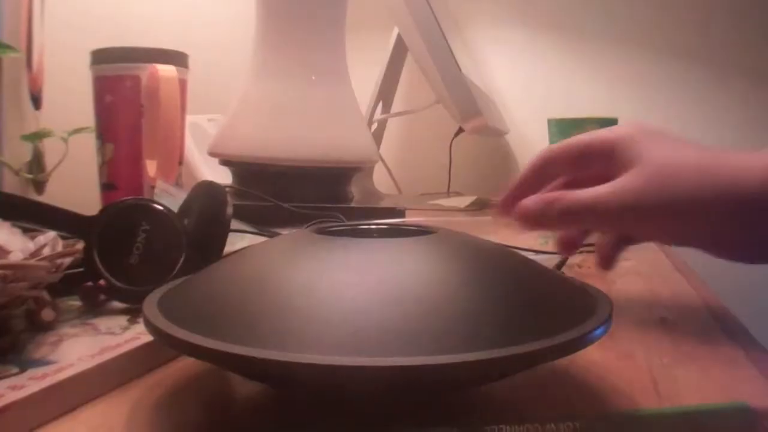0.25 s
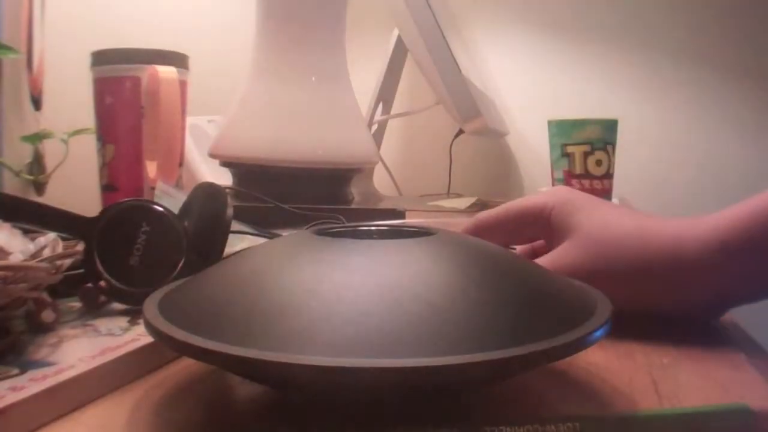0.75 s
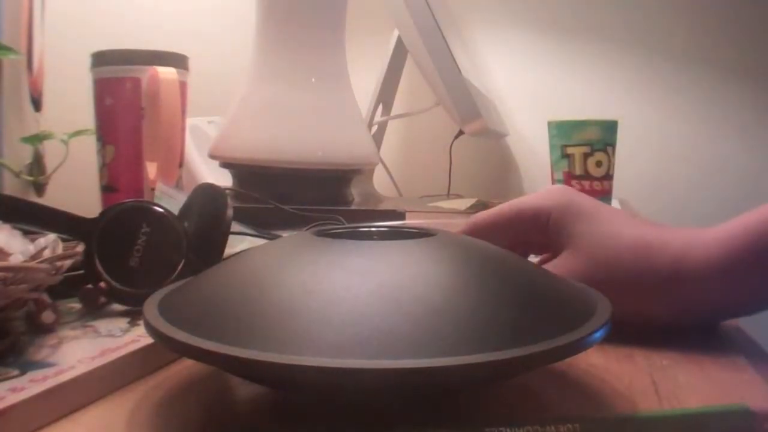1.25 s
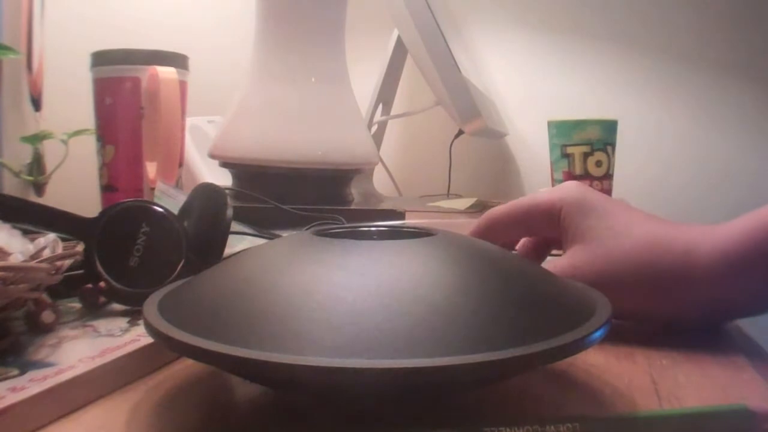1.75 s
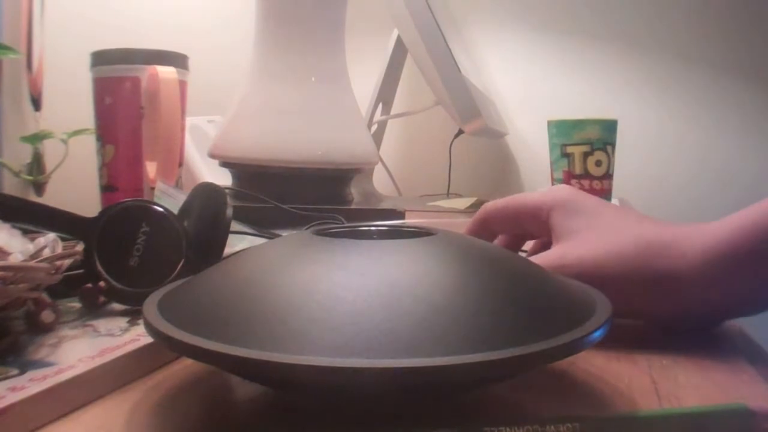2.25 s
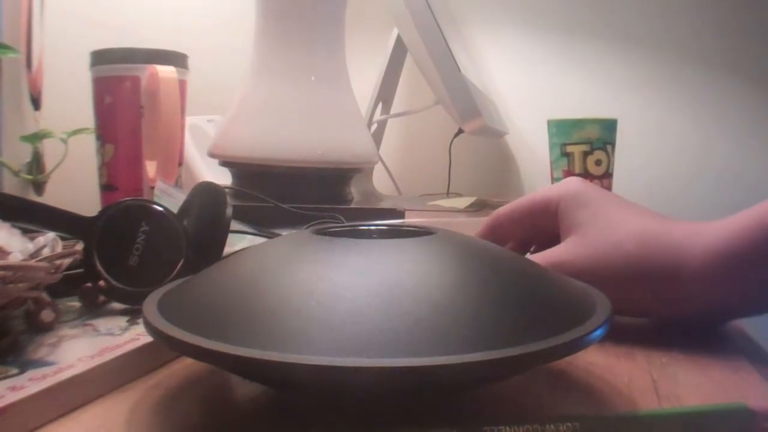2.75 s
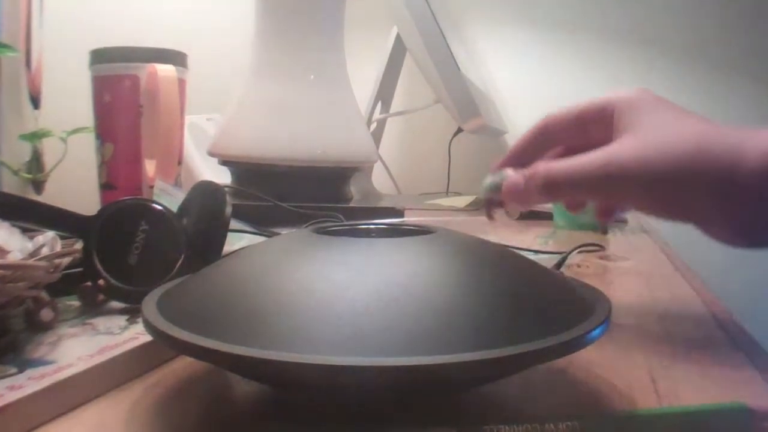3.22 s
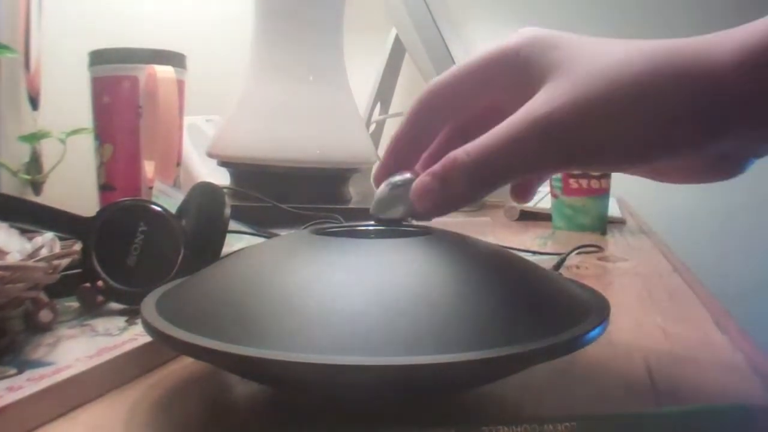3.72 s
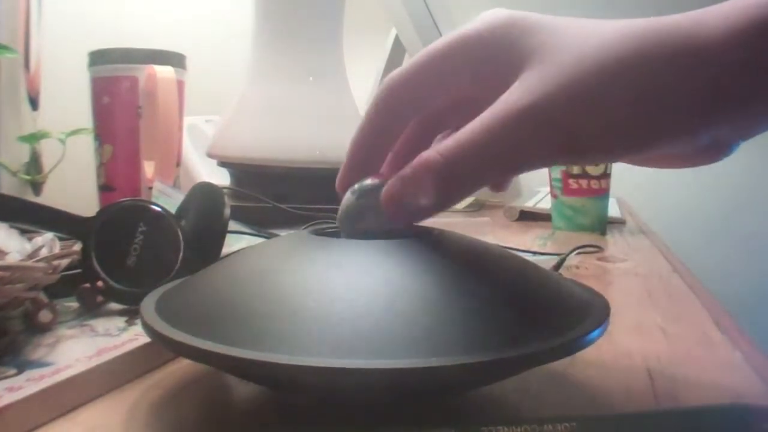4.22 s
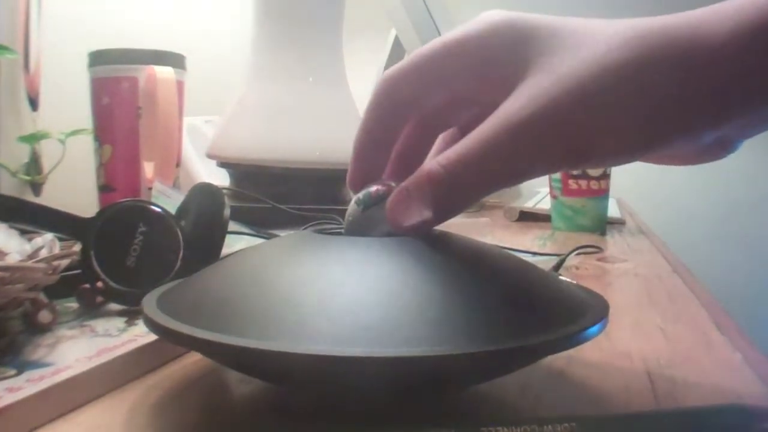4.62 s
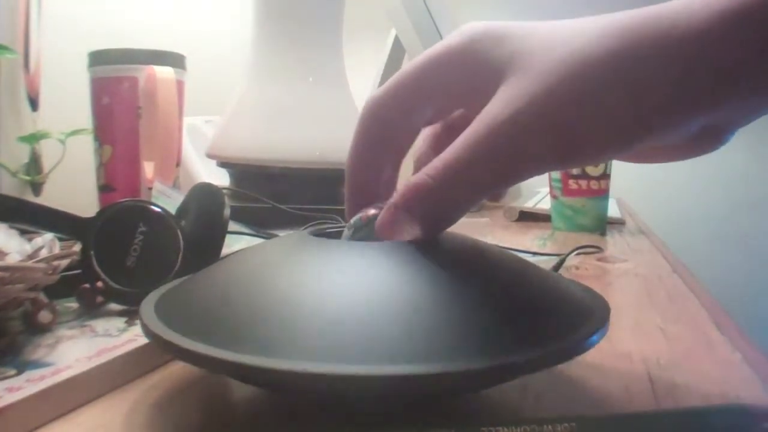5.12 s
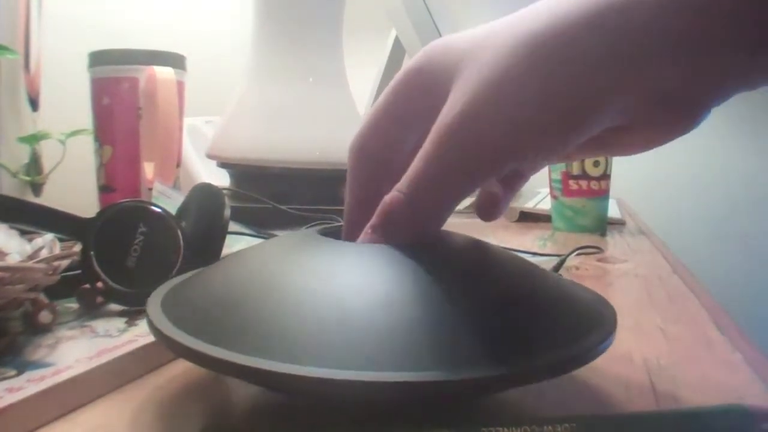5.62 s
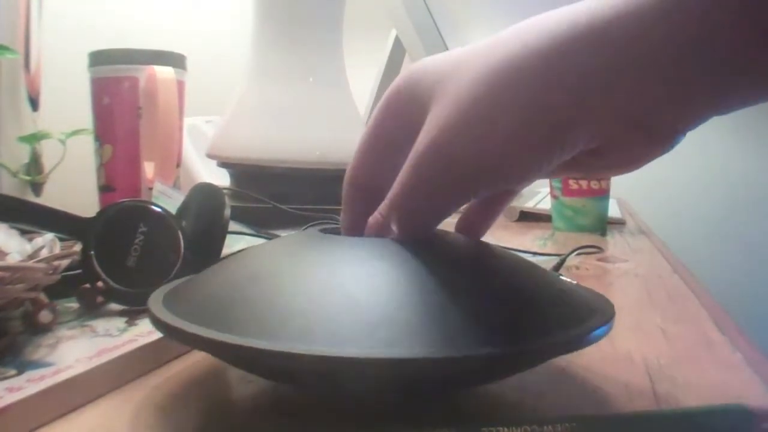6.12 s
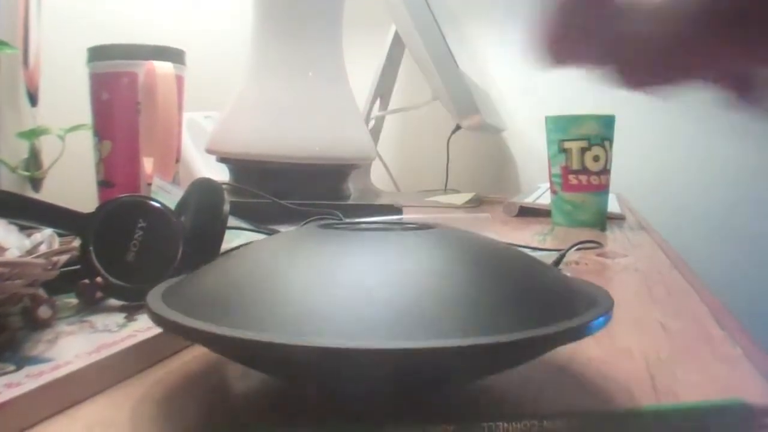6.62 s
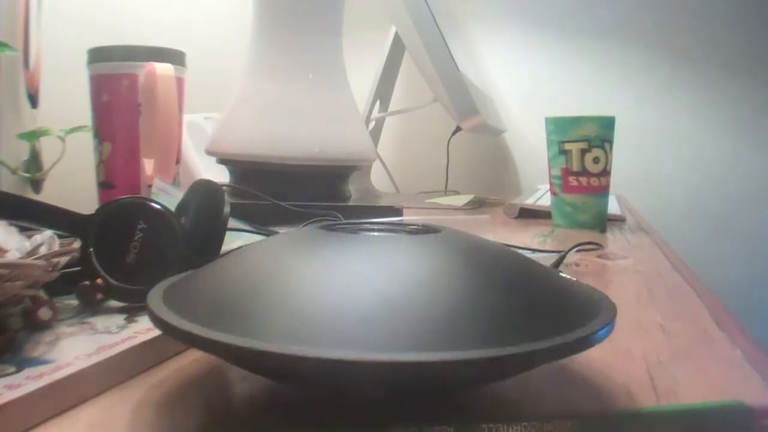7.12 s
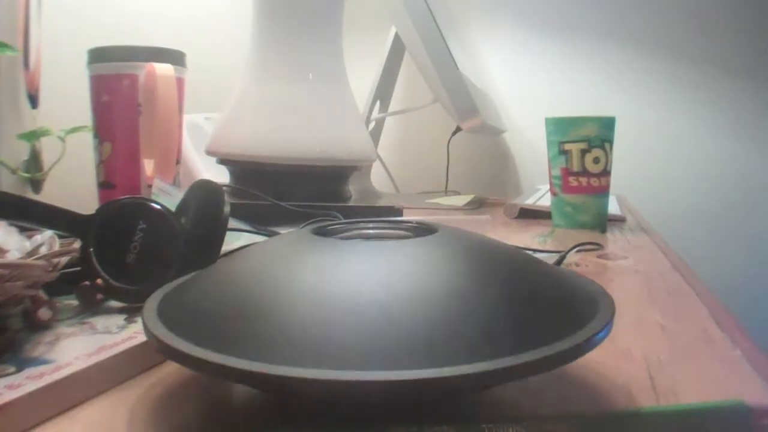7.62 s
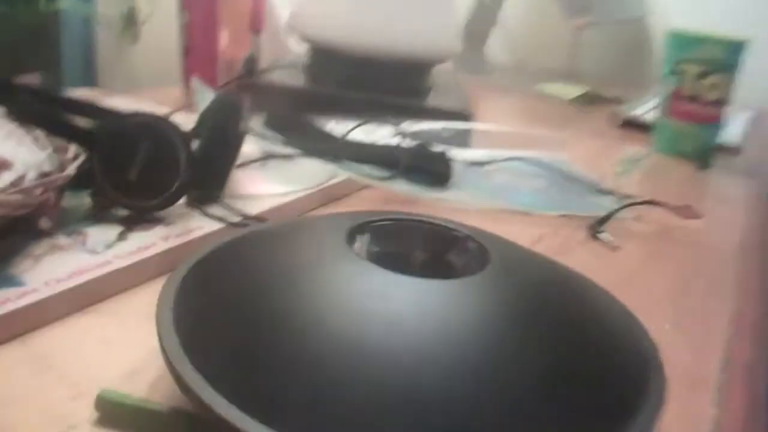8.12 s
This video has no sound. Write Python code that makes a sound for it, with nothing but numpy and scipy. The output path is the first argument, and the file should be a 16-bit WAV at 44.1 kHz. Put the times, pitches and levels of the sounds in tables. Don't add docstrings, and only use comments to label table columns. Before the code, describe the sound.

Close, rough stereo pickup on a table: a brief dip near the start, then dull finger taps, a sharp swipe and soft skin rubbing on wood. After a pause come bright shell snaps and short scrapes, then muted rim knocks. A hard landing rings the plastic bowl, followed by rapid clattering and gentle rocking. Faint ticks and cloth rustle follow, then the sound fades briefly and returns with grip noise.

```python
import sys
import numpy as np
from scipy import signal
from scipy.io import wavfile
from scipy.ndimage import uniform_filter1d

SR = 44100
rng = np.random.default_rng(int(sys.argv[2]) if len(sys.argv) > 2 else 0)


def unload_audio(sound):
    columns = np.transpose(np.atleast_2d(sound))
    steps = np.round(np.clip(columns, -1, 1) * 32767)
    wavfile.write(sys.argv[1], SR, steps.astype(np.int16))


def makeup_ratio(level_db):
    decades = np.asarray(level_db, float) / 20
    return 10 ** decades


N = 368676
RING_T = np.arange(4410) / SR
LIFT_S = 8.09


def evened(x):
    return x / np.sqrt(np.mean(x ** 2) + 1e-20)


def peaked(x):
    return x / abs(x.mean(0)).max()


def read(points, hz):
    f, value = np.transpose(points)
    return np.interp(np.log(hz + 1), np.log(f + 1), value)


def add(mix, s, sound):
    part = mix[:, round(s * SR):][:, :sound.shape[1]]
    part += sound[:, :part.shape[1]]


def band(x, low_hz, high_hz, order=2):
    edges = [low_hz, min(high_hz, .45 * SR)]
    return signal.sosfilt(signal.butter(order, edges, "band", fs=SR, output="sos"), x)


def resonate(x, hz, width):
    turn = np.exp(2j * np.pi * np.cumsum(hz * np.ones(x.shape[-1])) / SR)
    r = np.exp(-np.pi * width / SR)
    return 2 * (turn * signal.lfilter([1 - r], [1, -r], x / turn)).real


def ring(modes, struck_hz=None, length=1, scatter_db=3, reach=0.26):
    hz, db, t60 = np.transpose(modes)[..., None]
    luck = rng.standard_normal((len(modes), 4)).T[..., None]
    db = db + scatter_db * luck[0]
    if struck_hz:
        db = db - 6 * (np.log(hz / struck_hz) / reach) ** 2
    turn = 2 * np.pi * hz * (1 + .005 * luck[1]) * RING_T + .25 * luck[2]
    apart = np.clip(hz / 6000, 0, 1.2) * np.clip(luck[3], -1.2, 1.2)
    rise = (1 - np.exp(-RING_T * hz / 0.96)) ** 2
    fall = makeup_ratio(db - 60 * RING_T / (t60 * np.clip(length, .2, 4))) * rise
    return peaked(np.array([(fall * np.sin(turn + side * apart)).sum(0) for side in (-.5, .5)]))


def upper(modes, crack, length=1, left_db=0, grit_db=0, scatter_db=2, struck_hz=None, reach=0.42):
    low_hz, high_hz, db, t60 = crack
    air = rng.standard_normal((3, len(RING_T))) * np.minimum(RING_T / 0.00019, 1)
    fall = makeup_ratio(-60 * RING_T / (t60 * np.clip(length, .2, 4)))
    puff = band((air[:2] + 1.06 * air[2]) * fall, low_hz, high_hz, order=4)
    both = peaked(ring(modes, struck_hz, length, scatter_db, reach) + makeup_ratio(db + grit_db) * peaked(puff))
    return both * makeup_ratio([[left_db / 2], [-left_db / 2]])


def blows(events, body, cracks, scatter_db=5, grit_db=0, reach=0.21, clack_reach=.41):
    out = np.zeros((2, N))
    for s, db, clack_db, tick_db, hz, length, clack_hz in events:
        harder_db = grit_db + 0.27 * max(db + 12.0, 0)
        low = ring(body[0], hz, length, 1.5, reach=reach * makeup_ratio(0.17 * (db + 18.0)))
        clack = upper(body[1], cracks[0], length, 2.4, harder_db, scatter_db, clack_hz, clack_reach)
        tick = upper(body[2], cracks[1], length, 1.9, grit_db, scatter_db)
        add(out, s, makeup_ratio(db) * (low + makeup_ratio(clack_db + 4.5) * clack + makeup_ratio(tick_db + 6.0) * tick))
    return out


def brush(rows, width=1500):
    s, db, hz = np.transpose(rows)
    t = np.arange(s[0], s[-1], 1 / SR)
    db, hz = np.interp(t, s, db), np.interp(t, s, hz)
    air = rng.standard_normal((SR, 4))[:len(t)].T
    patchy_db = 2.7 * evened(uniform_filter1d(air[3], 900))
    air = air[:2] + 0.76 * air[2]
    hiss = evened(resonate(resonate(air, hz, width), hz, width))
    return s[0], makeup_ratio(db + patchy_db - 7.5) * hiss * signal.windows.tukey(len(t), .3)


# frequency in Hz, likeness from -1 to 1.
SAME = [(60, 0.93), (130, 0.98), (290, 0.97), (640, 0.9), (1410, 0.02), (3100, -0.019), (15000, -0.0035)]


def noise(spectrum, patchy_db, size, humps=()):
    frames, hz = 4 * N // size + 5, np.fft.rfftfreq(size, 1 / SR)
    a, b, c, d, patches = rng.standard_normal((frames, len(hz), 5)).T
    patches = evened(uniform_filter1d(uniform_filter1d(patches, 12, 0), 6, 1))
    same, left = np.clip(read(SAME, hz), -1, 1)[:, None], a + 1j * b
    z = np.array([left, same * left + np.sqrt(1 - same ** 2) * (c + 1j * d)])
    shape_db = read(spectrum, hz) + sum(db * np.exp(-((hz - f) / w) ** 2) for f, w, db in humps)
    z *= makeup_ratio(shape_db[:, None] + patchy_db * patches)
    return evened(signal.istft(z, nperseg=size, noverlap=3 * size // 4)[1][:, :N])


# frequency in Hz, level in dB per Hz.
HUM = [(15, -58), (25, -23), (69, -30), (140, -13.5), (344, -13.5), (1040, -24), (2180, -53.5),
       (5500, -120)]
HISS = [(900, 4.5), (2000, 0.5), (4000, -1.5), (8000, -3), (11000, -2), (14000, 0.5)]
# frequency in Hz, half width in Hz, height in dB.
DRONES = [(110.1, 27.4, 13.5), (178.6, 22.2, 11.5), (268.4, 52.3, 10.5), (484, 99, 5.5)]
# time in seconds, level in dB.
STIR = [(0.46, -51.5), (1.95, -49.5), (2.4, -52.5), (4.0, -61), (4.842, -47.5), (5.468, -58.5), (7.2, -50),
        (8.05, -52)]
# frequency in Hz, level in dB, channel (0 left, 1 right).
WHINES = [(7865, -78, 0), (11810, -75, 1)]


def floor():
    t = np.arange(N) / SR
    hum_db = -43.5 - 2.6 * (np.arange(N) > LIFT_S * SR)
    out = makeup_ratio(hum_db) * noise(HUM, 1.35, size=4096, humps=DRONES)
    out += makeup_ratio(-52.5) * noise(HISS, 0.42, size=1024)
    air, lumps = rng.standard_normal((2, N))
    grains = air * makeup_ratio(3.9 * evened(uniform_filter1d(lumps, 500)))
    out += makeup_ratio(np.interp(t, *np.transpose(STIR)) - 5.5) * evened(band(grains, 420, 1010))
    for f, db, side in WHINES:
        out[side] += makeup_ratio(db + 6.0) * np.sin(2 * np.pi * f * t)
    turns = np.cumsum([5.932, 0.041, 0.31, 0.11])  # start, fall, hold, return, s
    return out * makeup_ratio(np.interp(t, turns, [0, -8, -8, 0]))


# time in seconds, level in dB, centre in Hz.
BRUSHES = [
    [(.428, -50, 4200), (.475, -45, 3500)],
    [(.553, -20, 1900), (.58, -34, 1690), (.635, -46, 1200)],
    [(1.22, -50, 1800), (1.5, -52, 2200), (1.71, -51, 2300)],
    [(1.88, -69, 2620), (1.936, -46, 2640), (2.0, -68.5, 2260)],
    [(2.47, -78, 2920), (2.484, -45, 3100), (2.54, -59, 2710)],
    [(7.25, -50.5, 1580), (7.64, -48.5, 1700)],
]
# time in seconds, level in dB, centre in Hz.
RUBS = [
    [(.474, -36, 800), (.51, -46, 800)],
    [(1.045, -42, 900), (1.075, -45, 900)],
    [(1.245, -41, 900), (1.305, -45, 950)],
    [(1.686, -37, 1000), (1.715, -43, 1000)],
    [(1.935, -43, 950), (1.96, -45, 950)],
]
# time in seconds, level in dB, centre in Hz.
FLICK = [
    (2.476, -50, 8000),
    (2.49, -49, 8000),
    (2.53, -60, 7000),
]


def fingers(mix):
    for rows in BRUSHES:
        add(mix, *brush(rows))
    for rows in RUBS:
        add(mix, *brush(rows, width=800))
    add(mix, *brush(FLICK, width=9000))


# frequency in Hz, level in dB, time to die by 60 dB in seconds.
TABLE = [
    [(305, -9, 0.014), (390, 6.5, 0.02), (563, 3, 0.012), (692, 5, 0.017), (814, 1, 0.02), (1010, 2.5, 0.023), (1107, -12, 0.043), (1310, -3.5, 0.016), (1475, -15.5, 0.032)],
    [(1960, 0, 0.034), (2110, -3, 0.04), (2820, 12, 0.0097), (3220, -7, 0.0037)],
    [(7840, 0, 0.0057), (14360, -1, 0.0092)],
]
# low Hz, high Hz, level in dB, time to die by 60 dB in seconds.
TABLE_CRACKS = [
    (1260, 3230, 3.6, 0.012),
    (4630, 15900, 3.2, 0.027),
]
# time in seconds, body dB, clack dB relative to body, body pitch struck in Hz.
TAPS = [(0.472, -13, -22.5, 780), (0.516, -25.5, -14, 427), (0.549, -8, -11, 1080), (0.565, -18, -18, 900),
        (0.574, -21, -23, 850), (1.052, -25.5, -21, 490), (1.12, -30.5, -21, 474), (1.135, -32, -16, 500),
        (1.227, -30.5, -27, 446), (1.247, -26, -15.5, 870), (1.684, -19.5, -18, 820),
        (1.766, -22, -24, 620), (1.93, -25.5, -23, 474), (1.944, -30, -13, 1010), (2.038, -31.5, -22, 546),
        (1.721, -36, -24, 1050), (1.747, -40, -24, 1150), (2.439, -35, -19, 468), (2.544, -34.5, -28, 460),
        (2.676, -35, -21, 474), (5.406, -50, -31, 630)]
# time in seconds, body dB, clack dB relative to body, body pitch struck in Hz.
NAILS = [
    (0.431, -44, 2, 452),
    (0.444, -46.5, 0, 536),
    (2.479, -33, -13, 500),
]


def table_taps():
    length = 0.88
    taps = [(s, db, c, c - 11.5 - 0.12 * (db + 41), hz, length, None) for s, db, c, hz in TAPS]
    taps += [(s, db, c, c + 8, hz, length, None) for s, db, c, hz in NAILS]
    return blows(taps, TABLE, TABLE_CRACKS, reach=0.74)


# time in seconds, level in dB, pitch in Hz.
SQUEAKS = [
    [(1.55, -59, 3850), (1.62, -55, 3970), (1.68, -61, 3850)],
    [(1.51, -62, 2390), (1.575, -50, 2760), (1.67, -60, 2620)],
    [(1.83, -59, 2580), (1.925, -57, 2490)],
]


def squeaks(mix):
    for rows in SQUEAKS:
        add(mix, *brush(rows, width=110))


# frequency in Hz, level in dB, time to die by 60 dB in seconds.
BOWL = [
    [(498, -29, 0.01), (610, -4, 0.02), (649, 1.5, 0.037), (755, 7, 0.02), (775, -8, .055), (833, -8.5, 0.069), (909.4, -1.5, 0.034), (1010, -19.5, 0.1), (1072, -8, 0.095)],
    [(1140, 17, 0.07), (1548, 8, 0.04), (1885, 4, 0.04), (2118, 7.5, 0.04), (2340, 13.5, 0.036), (2467, 6, 0.044), (2762, 8.5, 0.049), (2920, 13, 0.022), (3686, 5.5, 0.054), (3850, 7, 0.03)],
    [(5470, -14, .01), (5820, 0, 0.02), (7250, -2, 0.0073), (8530, 2.5, 0.0099), (9900, -11, 0.0052), (11700, -15, 0.0051), (12100, -12, 0.0076), (13900, 6, 0.0092)],
]
# low Hz, high Hz, level in dB, time to die by 60 dB in seconds.
BOWL_CRACKS = [
    (1900, 4970, -6.5, 0.028),
    (5540, 14000, -5, 0.028),
]
# frequency in Hz, level in dB, time to die by 60 dB in seconds.
SHELL = [(5990, -2, 0.033), (8060, -15, .015), (9480, -8.5, 0.018), (12600, -11, .01), (13900, -8, .01)]
# time in seconds, body dB, clack dB and tick dB relative to body, body pitch in Hz.
RIM = [(3.638, -45.5, 6, -1, 710), (3.7348, -42, 10, 2, 760), (3.685, -45, 7.5, -14, 1110),
       (3.768, -37, 11.5, -5, 759), (4.269, -16.5, -19, -24, 570), (4.289, -29, -24, -24, 600),
       (4.327, -36, -25, -32, 640), (4.427, -13.5, -24.5, -42, 600), (4.458, -29, -16, -35, 590),
       (4.627, -36, -20, -15, 604), (4.695, -25, -38, -38, 583), (4.826, -34, -21, -14, 746),
       (4.64, -38, -12, -10.5, 600), (4.99, -26, -23, -21, 597), (5.001, -35, -11, -10, 641),
       (5.035, -35, -11, -18, 600), (5.073, -33.5, -21, -25, 605), (5.101, -39, -8, -7, 595),
       (5.558, -40, -5, -18, 764)]


def rim_knocks():
    rows = [(*row, 0.86, 2200) for row in RIM]
    cracks = (TABLE_CRACKS[0], BOWL_CRACKS[1])
    return blows(rows, [*BOWL[:2], SHELL], cracks, scatter_db=0.5, grit_db=-4, clack_reach=.45)


# frequency in Hz, level in dB, time to die by 60 dB in seconds.
CLAW = [(5700, -4, .015), (6000, 0, 0.025), (6920, -1.5, .015), (9600, 0, 0.013), (10470, -11, .008),
        (12700, -5, .012), (13900, 5, .012)]
# time in seconds, level in dB, brightest frequency in Hz.
CLAWS = [
    (3.6383, -17.5, 11000),
    (4.952, -35, 13000),
    (5.003, -34, 13500),
    (5.035, -40, 13500),
    (5.055, -42, 13900),
    (5.08, -42, 13900),
]


def claws():
    out = np.zeros((2, N))
    for s, db, hz in CLAWS:
        snap = upper(CLAW, BOWL_CRACKS[1], 0.9, left_db=4, grit_db=-4.5, scatter_db=3, struck_hz=hz, reach=0.55)
        add(out, s, makeup_ratio(db) * snap)
    return out


def scrape(rows, body, per_s=5000, spread_db=5.0, grit_db=-1):
    s, *columns = np.transpose(rows)
    t = np.arange(s[0], s[-1], 1 / SR)
    db, body_db, tick_db = (np.interp(t, s, c) for c in columns)
    where, size, sign, clump = rng.random((SR // 2, 4))[:len(t)].T
    slips = (where < per_s / SR) * np.maximum(size, .03) ** (-spread_db / 8.5) * np.sign(sign - .5)
    slips = slips * makeup_ratio(0.91 * evened(uniform_filter1d(clump - .5, 250)))
    low = ring(body[0], scatter_db=0.5)
    clack = upper([m for m in body[1] if m[0] > 1700], BOWL_CRACKS[0], 1.13, grit_db=grit_db)
    tick = upper(body[2], BOWL_CRACKS[1], 1.9, left_db=4, grit_db=1.0)
    out = 0
    for group, rel_db in ((low, body_db - 1.5), (clack, 0), (tick, tick_db)):
        rubbed = signal.fftconvolve(slips[None], group, axes=1)[:, :len(t)]
        out = out + makeup_ratio(db + rel_db) * evened(rubbed)
    return s[0], out * signal.windows.tukey(len(t), .08)


# start in seconds, length in seconds, clack dB, body dB and tick dB relative to clack.
SLIPS = [
    (3.638, 0.096, -42.5, -17, 3.5),
    (3.762, 0.11, -35, 1.5, -8),
    (4.27, 0.052, -50.5, 2, -6),
    (4.428, 0.056, -51.5, 10, -10),
    (4.62, 0.054, -54.5, 8.5, -5),
    (5.55, .05, -56, 9, -13),
    (5.82, 0.12, -57.5, 7, -6),
    (8.104, 0.056, -48.5, -18, -8.5),
]
# start in seconds, length in seconds, clack dB, body dB and tick dB relative to clack.
DRAGS = [(3.647, 0.019, -45.5, -15, 16.5), (3.724, 0.056, -30.5, -0.5, -4.5), (4.255, 0.018, -48, -1, 0),
         (4.375, 0.069, -59, 2, -10), (6.356, 0.036, -42.5, -10, -12), (6.503, 0.04, -48, 8, -8),
         (4.69, 0.049, -52, 10, 0), (4.755, 0.13, -51, 8, -3.5), (4.97, 0.078, -47.5, 7.5, -4),
         (5.06, 0.079, -54.5, 6, -2), (5.68, 0.061, -58.5, 4, -8), (8.155, 0.14, -38.5, -7, -10),
         (8.3, 0.072, -50.5, -7, -3)]


def strokes():
    rubs = []
    for s, n, db, *rel in SLIPS:
        rise_s, fade_db_per_s = 0.011, -260
        end_db = db + fade_db_per_s * (n - rise_s)
        rubs.append([(s, db + 0.5, *rel), (s + rise_s, db, *rel), (s + n, end_db, *rel)])
    for s, n, db, *rel in DRAGS:
        rubs.append([(s, db - 10.5, *rel), (s + 0.43 * n, db, *rel), (s + n, db - 16.5, *rel)])
    return rubs


# frequency in Hz, level in dB, time to die by 60 dB in seconds.
PINCH = [(2230, 0, .02), (2500, 0, .03), (3050, -3, .012), (3870, -5, .015)]
LIP = [(2135, 0.5, 0.023), (2455, -0.5, 0.05), (2620, -5, 0.049), (3010, -9, 0.022), (3600, -6, 0.026)]
GRIP = [(2870, 0.5, 0.02), (2300, -4, 0.02), (3230, -7, .015), (4050, -9, 0.01)]
GRIP_TICK = [(5370, -4, .008), (8350, -3, .006), (10950, -4, .01), (12900, -4, 0.011)]


def scrapes(mix):
    for rows in strokes():
        if rows[0][0] < 4:
            add(mix, *scrape(rows, (BOWL[0], PINCH, CLAW), grit_db=-1))
        elif rows[0][0] < LIFT_S:
            add(mix, *scrape(rows, (BOWL[0], LIP, SHELL), grit_db=-5))
        else:
            add(mix, *scrape(rows, (BOWL[0], GRIP, GRIP_TICK), per_s=1200, grit_db=3))


# time in seconds, body dB, clack dB and tick dB relative to body, body pitch struck in Hz.
DROP = (5.929, 1, -6, -11, 660)
# frequency in Hz, level in dB, time to die by 60 dB in seconds.
THUMP = [
    (240, 0, .03),
    (150, -3, .04),
]


def drop():
    length, clack_hz = .55, 2450
    out = blows([(*DROP, length, clack_hz)], BOWL, BOWL_CRACKS, scatter_db=.8, grit_db=-1, clack_reach=.62)
    add(out, DROP[0], makeup_ratio(-24) * ring(THUMP, scatter_db=0))
    return out


# time in seconds, body dB, clack dB relative to body,
# body pitch struck in Hz, clack pitch struck in Hz.
TUMBLE = [(5.936, -9.5, -25, 640, 2400), (5.952, -14, -17, 770, 2400), (6.058, -26.5, -21, 650, 2400),
          (6.063, -28, -20, 704, 2800), (6.074, -14, -10, 750, 3100), (6.081, -20, -14, 675, 2780),
          (6.1, -32, -26, 740, 2800), (6.133, -33, -13, 665, 2900), (6.139, -29, -30, 700, 2400),
          (6.151, -21, -23, 805, 2390), (6.172, -21.5, -25, 810, 2300), (6.217, -31, -26, 638, 2350),
          (6.236, -22, -21.5, 840, 2900), (6.295, -40, -24, 780, 2400), (6.326, -15.5, -24, 690, 2400),
          (6.358, -21, -30, 720, 2350), (6.37, -15.5, -32, 610, 2500), (6.397, -7.5, -19, 734, 2700),
          (6.41, -6, -22, 810, 2350), (6.42, -12, -18, 780, 2390), (6.432, -13, -20, 766, 3000),
          (6.446, -13.5, -26, 680, 2900), (6.511, -29, -12, 704, 2080)]
ROCK = [(6.549, -16, -31, 760, 2600), (6.637, -15, -19.5, 720, 2800), (6.71, -20, -26.5, 740, 2350),
        (6.717, -26, -30, 760, 2350), (6.809, -14, -19.5, 700, 2300), (6.848, -15, -26, 720, 2500),
        (6.86, -26, -26, 640, 2700), (6.896, -16.5, -27.5, 740, 2330), (6.924, -20.5, -24, 770, 2350),
        (6.938, -14.5, -27, 750, 2500), (6.966, -26, -26, 740, 2800), (6.999, -21, -30, 780, 2300),
        (7.026, -21.5, -36, 780, 2300), (7.06, -25.5, -25, 760, 2500), (7.079, -28, -22, 680, 2760),
        (7.093, -24.5, -31, 770, 2400), (7.111, -27, -30, 760, 2400), (7.122, -28, -30, 770, 2400)]


def tumble_and_rock():
    let_go_s, held, free, rocking = 6.2, 0.53, 0.91, 1.04
    shell = [(*row, held if row[0] < let_go_s else free) for row in TUMBLE]
    shell += [(*row, rocking) for row in ROCK]
    rows = [(s, db, c, c - 12 + 0.79 * (db + 17), hz, length, c_hz) for s, db, c, hz, c_hz, length in shell]
    return blows(rows, BOWL, BOWL_CRACKS, scatter_db=3.0)


# frequency in Hz, level in dB, time to die by 60 dB in seconds.
TRINKET = [
    [(797, 5, 0.029), (1080, 8, 0.014), (1590, 19, 0.031), (1840, -5, 0.033)],
    [(1820, 1, 0.048)],
    [(5000, 0, 0.01)],
]
# time in seconds, body dB, clack dB relative to body, body pitch struck in Hz.
ASIDE = [
    (7.254, -25, -13.5, 895),
]


def tap_aside():
    rows = [(s, db, c, c - 12, hz, 0.7, None) for s, db, c, hz in ASIDE]
    return blows(rows, TRINKET, TABLE_CRACKS, reach=0.33) * makeup_ratio([[-6], [3]])


# time in seconds, level in dB, centre in Hz.
RUSTLES = [
    [(7.4, -49, 3900), (7.45, -47, 4900)],
    [(7.51, -50, 4100), (7.58, -46, 4520)],
]


def sleeve(mix):
    for rows in RUSTLES:
        add(mix, *brush(rows))


# time in seconds, body dB, clack dB relative to body,
# body pitch struck in Hz, ring length as a factor.
LEGS = [(7.499, -30.5, -39, 740, 0.95), (7.558, -27, -21.5, 680, 1), (7.603, -38, -7.5, 970, 0.43),
        (7.709, -33.5, -36, 630, 0.7), (7.765, -36, -16.5, 616, 1), (7.819, -38, -16, 980, 0.3),
        (7.899, -39.5, -26, 606, 0.99), (7.985, -31.5, -29, 664, 0.92), (8.158, -36.5, -9, 660, 0.68),
        (8.211, -32, -18, 764, 0.64), (8.229, -35, -20, 800, 0.78)]


def legs():
    rows = [(s, db, c, c, hz, length, 2500) for s, db, c, hz, length in LEGS]
    return blows(rows, BOWL, BOWL_CRACKS, scatter_db=3.0)


# time in seconds, level in dB.
CREAKS = [(8.161, -32), (8.1704, -37), (8.18, -31), (8.1915, -30), (8.2136, -32), (8.228, -31),
          (8.2906, -37), (8.314, -37), (8.326, -31), (8.3386, -37), (8.3477, -29.5)]


def creaks():
    clack_db, pitch_hz, length = 18, 758, 0.48
    rows = [(s, db - clack_db, clack_db - 10.5, clack_db - 8.0, pitch_hz, length, None) for s, db in CREAKS]
    return blows(rows, (BOWL[0], GRIP, GRIP_TICK), TABLE_CRACKS)


# frequency in Hz, time to die by 60 dB in seconds.
ROOM = [(200, 0.23), (800, 0.21), (2000, 0.28), (5000, 0.24), (14000, 0.31)]


def room(x):
    taps = np.zeros((2, SR // 2))
    at = np.arange(260, SR // 2 - 20, 20) + rng.integers(0, 20, (2, (SR // 2 - 261) // 20))
    np.put_along_axis(taps, at, rng.choice([-1., 1.], at.shape), 1)
    bass = signal.lfilter([.2], [1, -.8], taps)
    hz, t, z = signal.stft(taps - bass + bass[0], SR, nperseg=256)
    tail = signal.istft(z * makeup_ratio(-60 * t / read(ROOM, hz)[:, None]), SR, nperseg=256)[1]
    return signal.fftconvolve(x.mean(0)[None], tail / np.linalg.norm(tail[0]), axes=1)[:, :N]


def in_the_room(near):
    near = near + makeup_ratio(-11.5) * np.roll(band(near, 384, 1500), round(.0102 * SR), axis=1)
    wet = room(near)
    return near + makeup_ratio(-9.0) * band(wet, 60, 3500, order=1) + makeup_ratio(-19) * band(wet, 5000, 16000)


def scene():
    knocks = table_taps() + rim_knocks() + claws() + drop() + tumble_and_rock()
    knocks += tap_aside() + legs() + creaks()
    near = in_the_room(knocks)
    for rub in (fingers, squeaks, scrapes, sleeve):
        rub(near)
    return band(near, 90, 18000) + floor()


# silent from in seconds, back at in seconds, fade-out seconds, fade-in seconds.
CUTS = [
    (0.089, 0.117, 0.093, 0.11),
    (8.06, 8.094, 0.14, 0.026),
]


def fades():
    t, gain = np.arange(N) / SR, 1
    for off, on, out_s, in_s in CUTS:
        down = np.clip((off - t) / out_s, 0, 1) ** 0.4
        up = np.clip((t - on) / in_s, 0, 1) ** 0.92
        gain = gain * np.maximum(down + up, makeup_ratio(-52))
    return gain


def top_cut(x):
    return signal.sosfilt(signal.butter(12, 15640, fs=SR, output="sos"), x)


def record(dry):
    clipped = np.clip(dry, -.86, .86)
    edge = signal.firwin(511, 14230, window=("kaiser", 8), fs=SR)
    low = signal.oaconvolve(clipped, edge[None], "same")
    top = clipped - low
    top *= uniform_filter1d(abs(top).mean(0), 500) > makeup_ratio(-52)
    return top_cut((low + makeup_ratio(-10.0) * top) * fades())


dry = scene()
out = record(dry)
unload_audio(out)
```